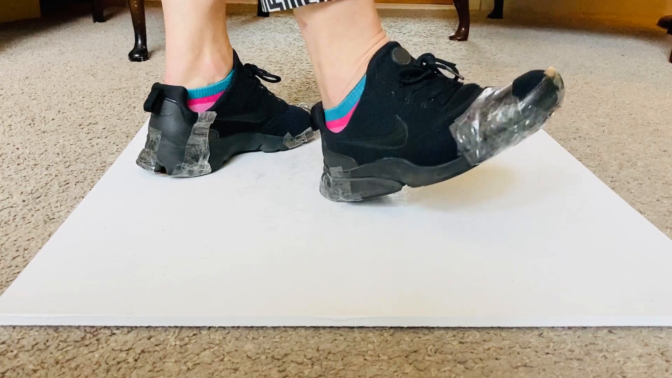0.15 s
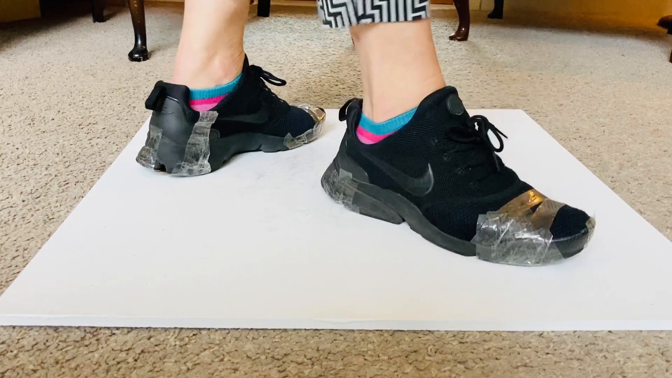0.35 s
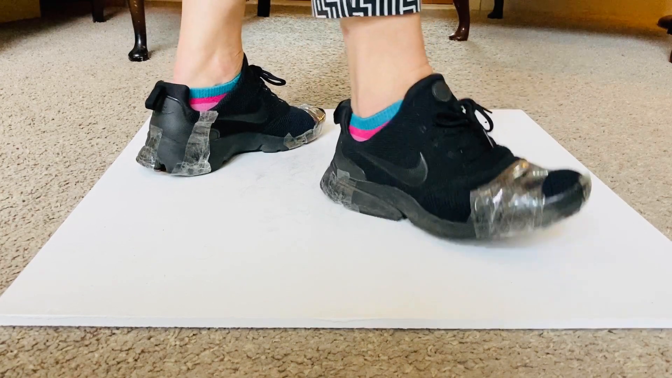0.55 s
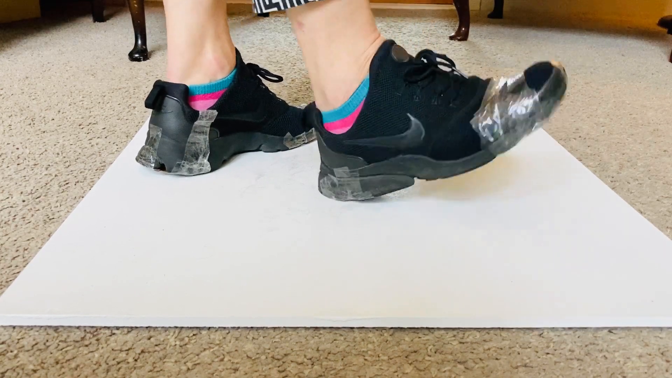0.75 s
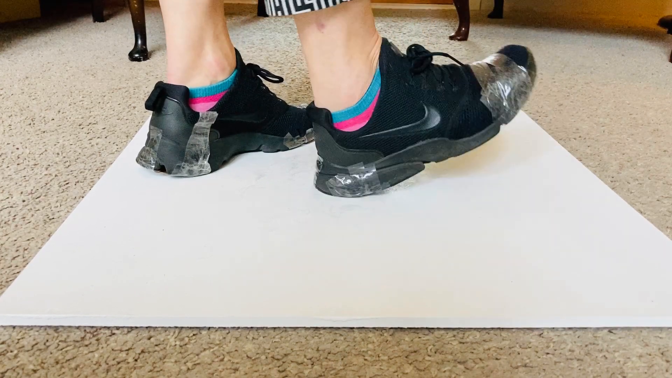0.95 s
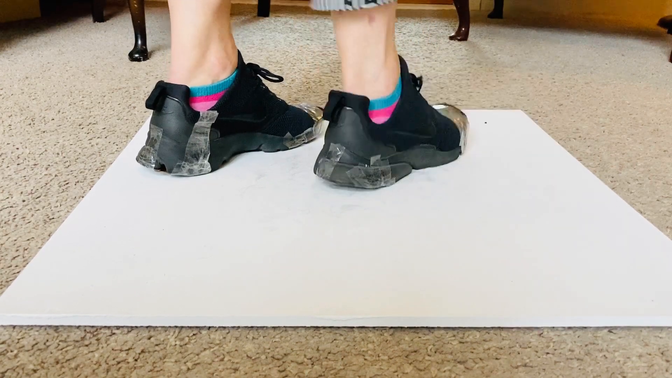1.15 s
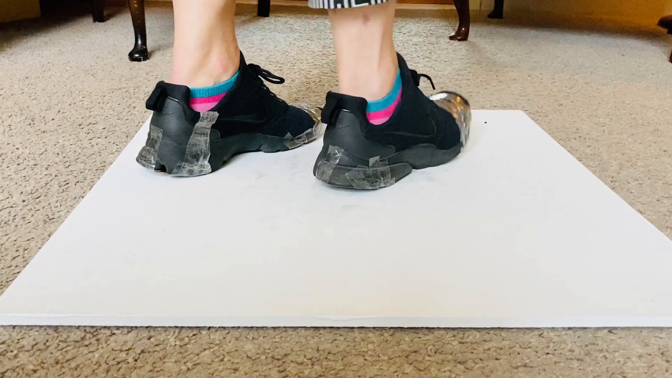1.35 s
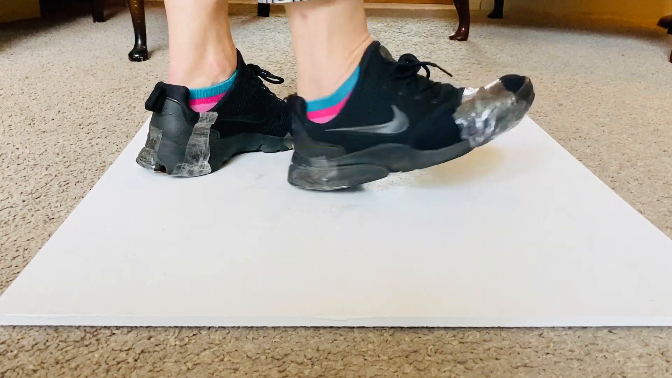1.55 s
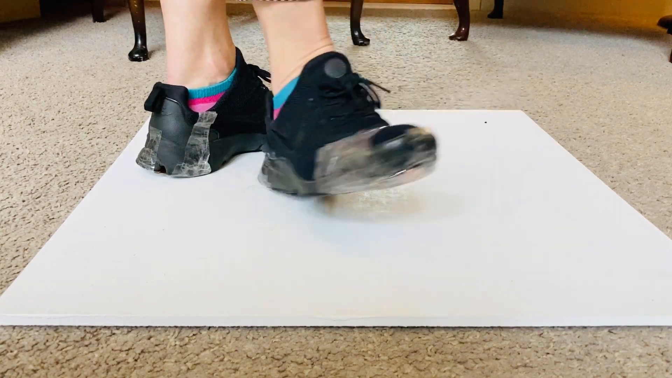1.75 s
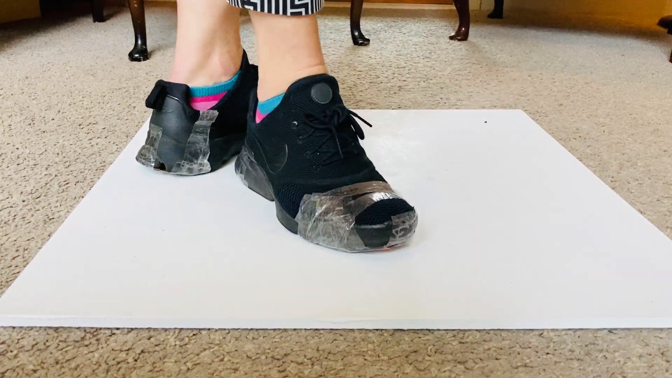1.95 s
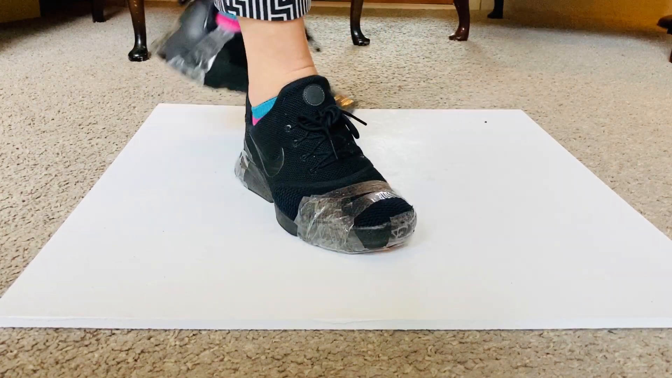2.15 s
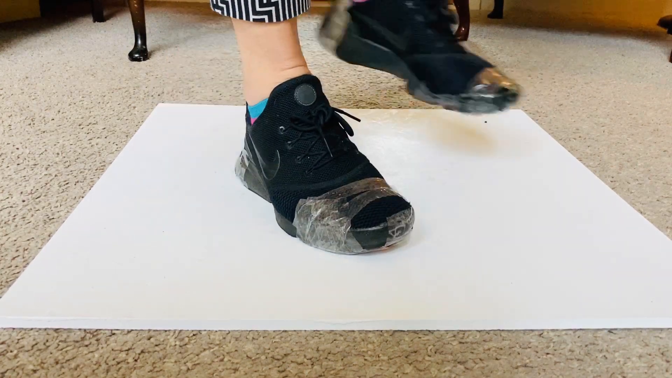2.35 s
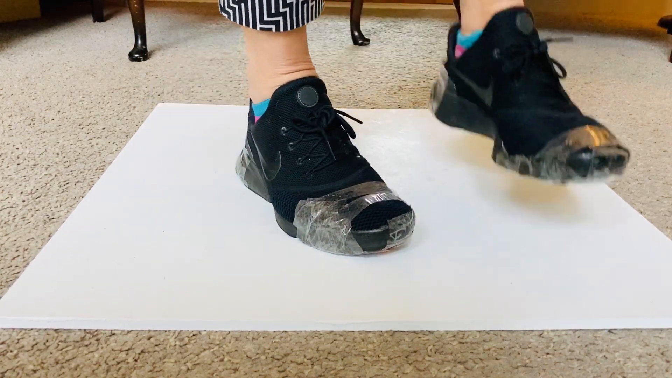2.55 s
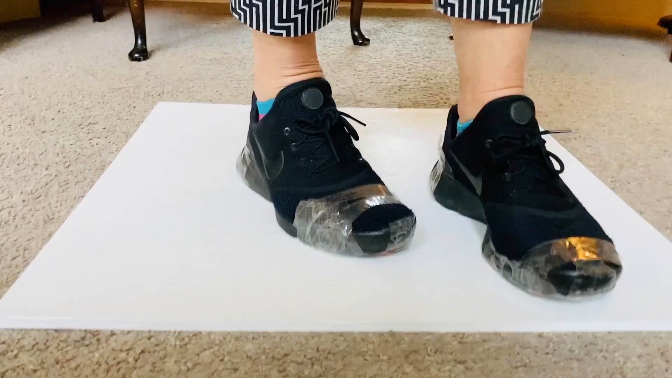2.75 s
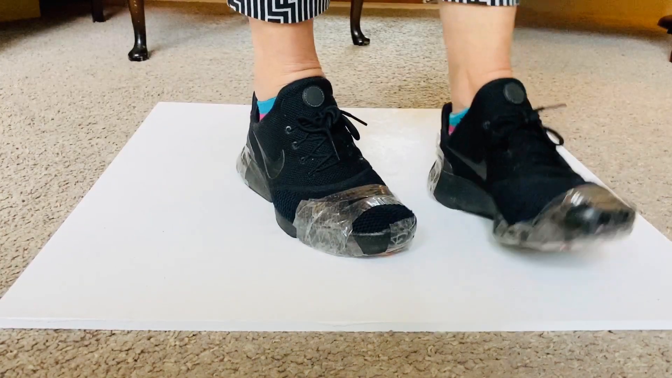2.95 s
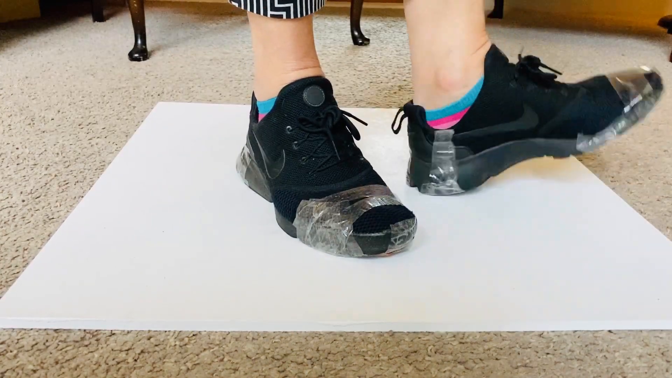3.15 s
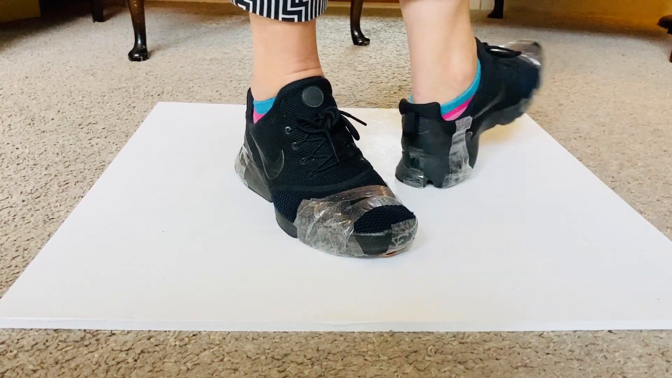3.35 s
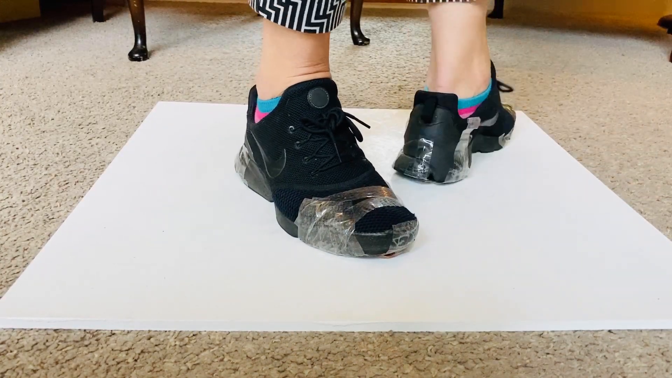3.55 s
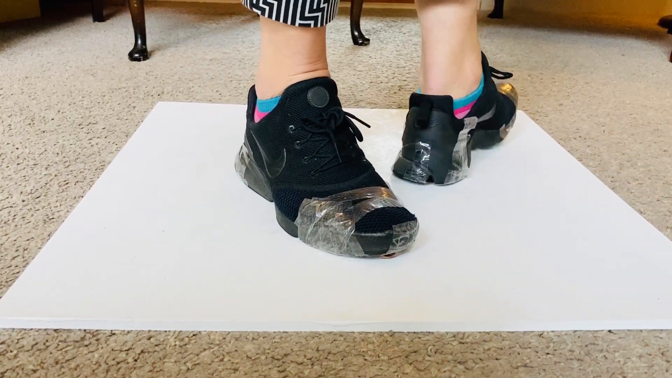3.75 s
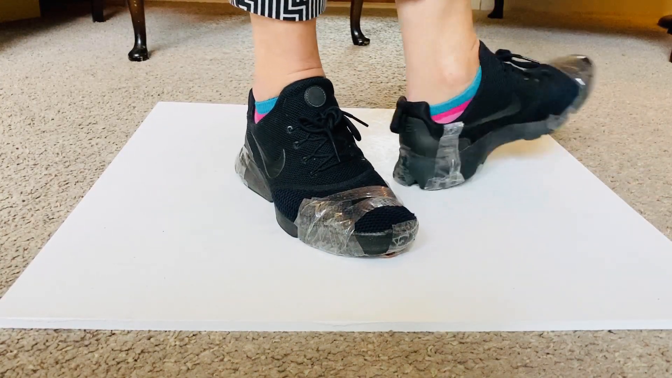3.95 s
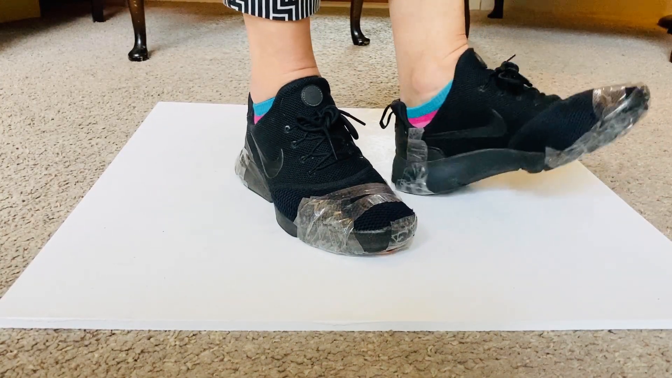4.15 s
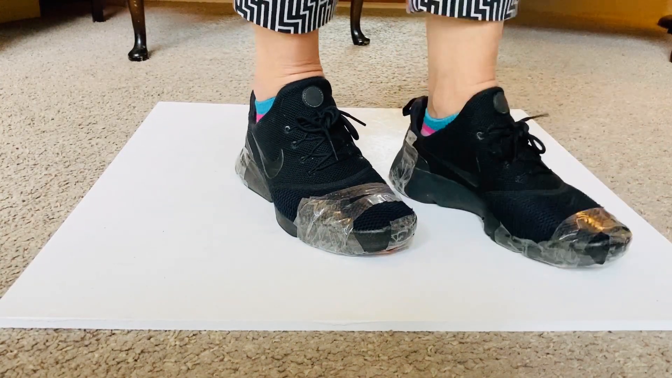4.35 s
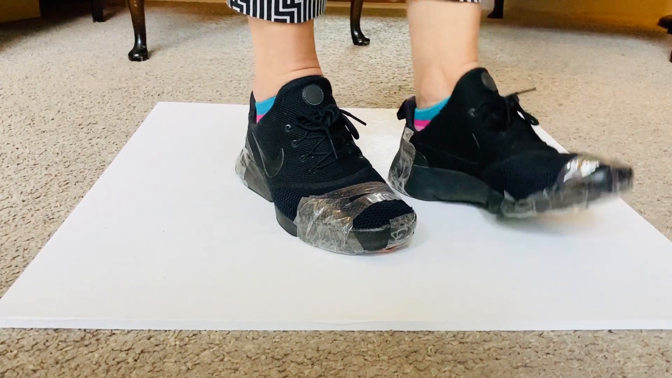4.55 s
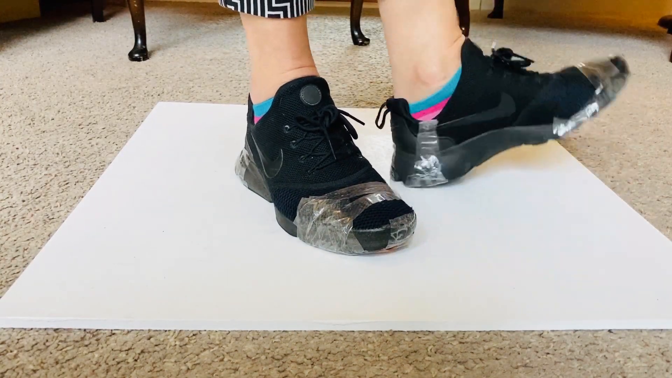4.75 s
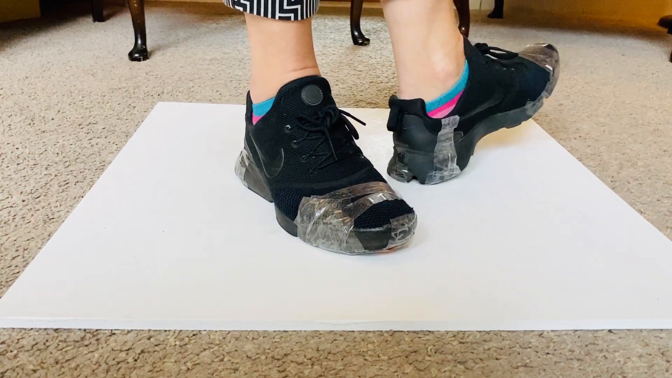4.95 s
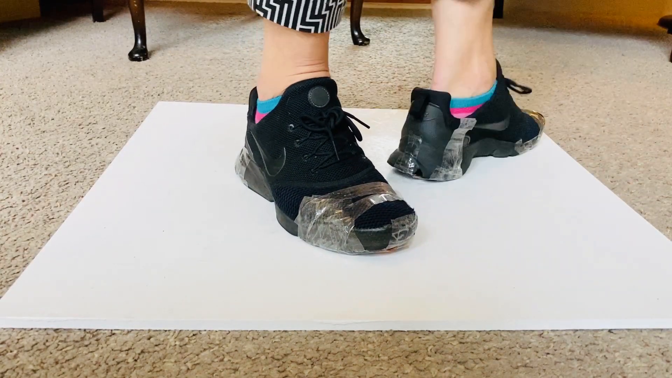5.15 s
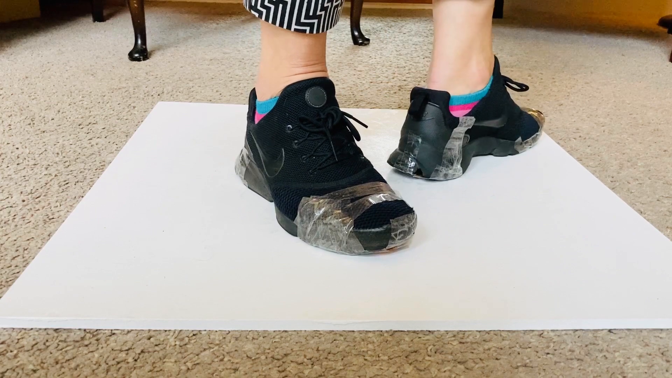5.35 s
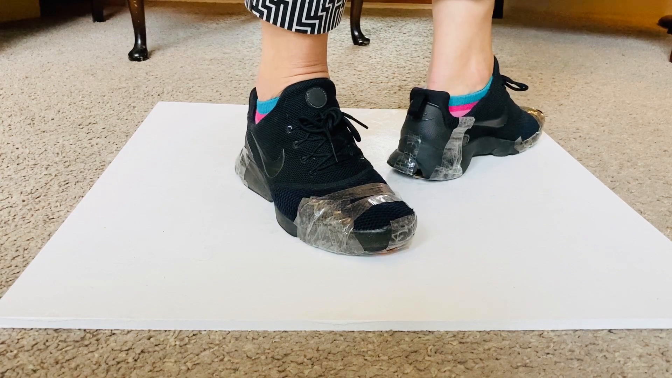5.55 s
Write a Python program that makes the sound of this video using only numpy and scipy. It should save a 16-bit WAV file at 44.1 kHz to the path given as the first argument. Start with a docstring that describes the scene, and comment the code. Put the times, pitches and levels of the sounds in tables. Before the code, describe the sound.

Taped rubber-soled shoes tap seven evenly spaced steps on a thin board over carpet, with crackling tape and soft cloth rustle between.

```python
"""Shoes with tape round toe and heel tap seven times on a thin board lying on carpet in a living room.
First the tape crackles and clothes rustle; about every 0.8 s, from 0.4 s to 5.2 s, a step comes down.
A gritty brush leads into a knock of the sole, then random collisions slap as the board is pressed flat,
and a thump sets slowly swelling low tones booming. Between steps come tape snaps, grazes and cloth rubs.
The room answers with fading noise over a faint hush, and all is heard close by in stereo."""
import sys
import numpy as np
from scipy import signal
from scipy.fft import rfft, irfft, next_fast_len
from scipy.io import wavfile

SR = 44100
rng = np.random.default_rng(int(sys.argv[2]) if len(sys.argv) > 2 else 0)


def dump(signal):
    """Clip the signal to [-1, 1] and save it as 16-bit WAV at the path in sys.argv[1]."""
    limited = np.clip(np.atleast_2d(signal).T, -1, 1)
    pcm = np.round(limited * 32767).astype(np.int16)
    wavfile.write(sys.argv[1], SR, pcm)


N = 246959
T = np.arange(N) / SR

# The sole meets the board: (time [s], level [dB], pitch [Hz], gritty edge level [dB],
# then the brush that leads in: swell time [s], level [dB], scrape pitch [Hz])
KNOCKS = [(0.4059, -8.5, 487, -17.5, 0.018, -33, 2280), (1.2393, -12.5, 455, -26.5, 0.016, -34, 7500),
          (1.953, -11.5, 433, -26.5, 0.023, -38.5, 6650), (2.766, -11, 331, -37.5, 0.005, -29.5, 2747),
          (3.6138, -24, 390, -30.5, 0.014, -34, 2980), (4.4106, -9, 462, -16, 0.021, -36.5, 2300),
          (5.1965, -25, 505, -29.5, 0.021, -39, 6870)]
# Board and taped sole clap together:
# (time [s], contact length [s], level [dB], brightest pitch [Hz], dull above [Hz])
SLAPS = [(0.4107, 0.0051, -11, 3120, 9000), (1.2448, 0.0036, -20, 3820, 5730),
         (1.2507, 0.0029, -11.5, 3870, 5180), (1.963, 0.0012, -22, 2420, 7870),
         (2.7647, 0.0037, -9.5, 3350, 9000), (2.778, 0.0027, -12.5, 7600, 13000),
         (3.621, 0.0067, -13.5, 4200, 5430), (4.418, 0.0054, -10.5, 4020, 8700),
         (5.2023, 0.0049, -10.5, 3380, 7180)]
# Weight comes down: (time [s], thump level [dB], ring time factor [-],
# then how hard it drives the low, middle and high tones of the boom [dB], [dB], [dB])
THUMPS = [(0.419, -19, 1.28, -33.5, -33, -37), (1.2537, -9.5, 0.91, -23.5, -12.5, -22),
          (1.968, -22, 0.75, -19.5, -16, -22.5), (2.566, -58, 0.39, -49, -44, -45.5),
          (2.786, -14.5, 1.3, -22, -30, -30.5), (3.627, -14.5, 0.9, -36.5, -30, -30),
          (4.4260, -10, 0.78, -30.5, -12.5, -19), (5.2112, -12, 0.69, -28.5, -26.5, -21)]


def from_db(db):
    """Turn decibels into gain."""
    return 10 ** (np.asarray(db) / 20)


def rms_one(x):
    """Scale a sound so that its rms is 1."""
    return x / np.sqrt(np.mean(x ** 2) + 1e-20)


def at_hz(points, hz, axis=1):
    """Read a column of a table at any pitch, on a log-frequency axis."""
    table = np.array(points)
    return np.interp(np.log(np.maximum(hz, 1)), np.log(table[:, 0]), table[:, axis])


def add(out, s, sound):
    """Mix a sound in, starting at a time in seconds."""
    start = max(round(s * SR), 0)
    out[..., start:start + sound.shape[-1]] += sound[..., :N - start]


def colour(x, points, size=4096):
    """Filter with the given spectrum, unit energy and no sound ahead of its cause (minimum phase)."""
    level_db = at_hz(points, np.fft.rfftfreq(size, 1 / SR))
    cepstrum = irfft(np.log(from_db(level_db)))
    # folding the cepstrum onto its first half gives minimum phase
    cepstrum[1:size // 2] *= 2
    cepstrum[size // 2 + 1:] = 0
    pulse = irfft(np.exp(rfft(cepstrum)))
    pulse = pulse / np.linalg.norm(pulse)
    return signal.fftconvolve(np.atleast_2d(x), pulse[None], axes=-1)[:, :N]


def band_pass(x, low_hz, high_hz):
    """Keep only the part of a sound between two pitches."""
    return signal.sosfilt(signal.butter(2, [low_hz, high_hz], "band", fs=SR, output="sos"), x)


def pair(two, likeness):
    """Turn two unrelated signals into left and right with the given correlation."""
    alike = np.clip(likeness, -1, 1)
    middle = np.sqrt((1 + alike) / 2) * two[0]
    side = np.sqrt((1 - alike) / 2) * two[1]
    return middle + side * np.array([[1], [-1]])


def grains(size, per_s, spread_db):
    """Make two trains of random clicks of uneven height, together of rms 1."""
    shape = (2, size)
    heights = from_db(spread_db * np.minimum(rng.exponential(1, shape), 4))
    heights = heights * rng.choice([-1, 1], shape)
    return rms_one(heights * (rng.random(shape) < per_s / SR))


def knocks(cycles=0.94, edge_s=0.0052):
    """The rubber sole bends the board for about two cycles; its tape gives the touch a gritty edge."""
    out, t = np.zeros((2, N)), T[:SR // 20]
    for s, level_db, hz, edge_db, *brush in KNOCKS:
        age = t * hz / cycles
        rise_and_fall = age ** 2 * np.exp(2 * (1 - age) - 0.55 * (age - 1) ** 2)
        bend = rise_and_fall * np.sin(2 * np.pi * hz * t)
        grit = band_pass(grains(len(t), 4000, 1.0), 700, 1900)
        edge = rms_one(pair(grit, 1.0)) * np.exp(-t / edge_s)
        add(out, s, from_db(level_db) * bend + from_db(edge_db) * edge)
    return out


def slaps(release_s=0.0013, focus_db=-2, focus_q=2.1):
    """Contact spreads over the sole in milliseconds: tiny collisions, each slap with its brightest band."""
    # spectrum of a slap: (pitch [Hz], relative level [dB])
    slap_colour = [(200, -4), (600, -7), (1000, -7.5), (1500, -14.5), (2200, -5), (3800, -3), (5200, -1),
                   (7000, -9), (10000, -14.5), (13000, -9.5), (16000, -27)]
    out, t = np.zeros((2, N)), T[:SR // 30]
    for s, length_s, level_db, bright_hz, dull_hz in SLAPS:
        contact = np.exp(-np.maximum(t - length_s, 0) / release_s - 0.14 * t / length_s)
        burst = pair(grains(len(t), 7000, 1.1), 0.67) * contact
        # each side gets the energy of the contact curve
        burst *= np.linalg.norm(contact) / np.linalg.norm(burst, axis=1, keepdims=True)
        focus = signal.lfilter(*signal.iirpeak(bright_hz, focus_q, fs=SR), burst)
        burst = burst + from_db(focus_db) * focus
        soft = signal.butter(2, min(dull_hz, .45 * SR), fs=SR, output="sos")
        add(out, s, from_db(level_db) * signal.sosfilt(soft, burst))
    return colour(out, slap_colour)


def thumps(width_s=0.002, leak_hz=55):
    """The sinking board moves the air in one slow swing, down and up; the deepest part leaks round its edge."""
    out = np.zeros(N)
    lead_s = 1 / 40  # the middle of the swing falls on the listed time
    for s, level_db, *drive in THUMPS:
        age = (T[:SR // 20] - lead_s) / width_s
        swing = age * np.exp((1 - age ** 2) / 2)
        add(out, s - lead_s, from_db(level_db) * swing)
    return signal.sosfilt(signal.butter(1, leak_hz, "high", fs=SR, output="sos"), out)


def boom(swell_s=0.016):
    """Low tones of board and room swell and die; the foot decides which ring most and how soon they fade."""
    # tones: (pitch [Hz], level [dB], time to fall 60 dB before the step's ring time factor [s])
    boom_modes = [(42.6, -12, 0.87), (56.7, 5, 0.41), (60.15, 0.5, 0.5), (76.15, 1.5, 0.38), (87, -22, .3),
                  (108.1, 7.5, .3), (122, -12.5, 0.5), (153, -7.5, 0.34), (151, -12, 0.072)]
    # pitches at which the three drive levels of each thump apply: low, middle, high [Hz]
    drive_hz = (56, 77, 110)
    out, t = np.zeros(N), T[:SR]
    for s, level_db, ring_factor, *drive_db in THUMPS:
        for hz, mode_db, t60 in boom_modes:
            loudness = from_db(np.interp(hz, drive_hz, drive_db) + mode_db)
            fade = loudness * np.exp(-np.log(1000) * t / (t60 * ring_factor))
            add(out, s, fade * (1 - np.exp(-t / swell_s)) * np.cos(2 * np.pi * hz * t))
    return out


def board(uneven_db=3.5, gain_db=6.5):
    """Every slap rings the board's modes, with strengths that vary at random by slap, alike on both sides."""
    # the board's own tones: (pitch [Hz], level before gain_db [dB], time to fall 60 dB [s])
    board_modes = [(236, -39.5, 0.56), (317, -35, 0.046), (402, -33, 0.042), (562, -32.5, 0.18),
                   (699, -38, 0.16), (960, -34.5, 0.12), (1199, -37.5, 0.2), (1338, -39, 0.18),
                   (1933, -36, 0.24), (2230, -32, 0.13), (2508, -29.5, 0.19), (3430, -30.5, 0.058),
                   (3400, -36.5, 0.071), (3650, -27.5, 0.067), (4530, -33.5, .1), (5130, -35, .1),
                   (5060, -37.5, .1), (6300, -44, 0.091)]
    out, t = np.zeros((2, N)), T[:SR // 3]
    hz, mode_db, t60 = np.transpose(board_modes)[:, :, None]
    fade = from_db(mode_db + gain_db) * np.exp(-np.log(1000) * t / t60)
    rings = fade * np.sin(2 * np.pi * hz * t)
    shape = (2, len(board_modes))
    for s, length_s, level_db, *colouring in SLAPS:
        strengths = from_db(uneven_db * rng.standard_normal(shape)) * rng.choice([-1, 1], shape)
        add(out, s, from_db(level_db) * pair(strengths, 1.0) @ rings)
    return out


def snaps(crack_db=14, body_db=20, tear_s=0.00049, settle_db=-13, count=3):
    """A crease in the tape flips: one sharp click, a brief tearing, then a few smaller creases settle."""
    # the loudest snaps: (time [s], level before crack_db or body_db [dB], duller body relative to it [dB])
    loud_snaps = [(0.0642, -25.5, -25), (0.316, -47.5, -3.5), (0.698, -34.5, -5), (0.7596, -32, -7.5),
                  (0.7736, -19.5, -14.5), (0.8362, -32.5, -7.5), (1.1466, -32, -25), (1.164, -25.5, -13.5),
                  (1.523, -29, -32), (1.5729, -26.5, -5.5), (1.6527, -29, -29), (1.9758, -26.5, -12),
                  (2.001, -26.5, -9), (2.0393, -28.5, -37), (2.3145, -27, -27.5), (2.4588, -40.5, -15),
                  (2.4743, -33, -5), (2.9574, -27, -12), (2.977, -33, -8), (3.044, -31.5, -33),
                  (3.143, -37.5, -6.5), (3.3129, -30, -19.5), (3.3355, -27.5, -34.5), (3.4493, -31, -27),
                  (3.486, -36.5, 0), (3.5404, -20.5, -34), (3.8569, -27.5, -31.5), (3.9017, -28.5, -33),
                  (3.953, -28, -26), (4.1695, -33.5, -27), (4.3485, -22.5, -13), (4.4484, -16.5, -5.5),
                  (4.5458, -28.5, -14), (4.6662, -30.5, -21), (4.7296, -23, -7.5), (5.046, -28.5, -35.5),
                  (5.1086, -34, -6.5), (5.4037, -26.5, -31), (5.45, -29.5, -28)]
    # spectrum of the crack: (pitch [Hz], relative level [dB])
    crack_colour = [(1000, -25), (3000, -22), (5500, -0.5), (7800, -4), (11000, 0), (13500, -10),
                    (16000, -12.5)]
    # spectrum of the body: (pitch [Hz], relative level [dB])
    body_colour = [(300, -40), (1000, -17.5), (2200, 1.5), (3500, -4.5), (5000, -2), (9000, -9)]
    cracks, bodies, t = np.zeros((2, N)), np.zeros((2, N)), T[:SR // 25]
    for s, peak_db, body_rel_db in loud_snaps + small_snaps():
        flip = 0.52 * pair(grains(len(t), 12000, 7.5), 0.86) * np.exp(-t / tear_s)
        flip[:, 0] += 1  # the sharp click
        flip /= np.linalg.norm(flip)
        later = rng.integers(SR // 600, len(t), count)
        flip[:, later] += from_db(settle_db) * rng.standard_normal(count) * np.exp(-t[later] / 0.016)
        add(cracks, s, from_db(peak_db + crack_db) * flip)
        add(bodies, s, from_db(peak_db + body_db + body_rel_db) * flip)
    return colour(cracks, crack_colour) + colour(bodies, body_colour)


def small_snaps(count=70, over_crinkle_db=24, spread_db=4, body_rel_db=-12.5):
    """Lesser snaps come at random times, their level following how much the shoe bends just then."""
    places, sizes = rng.integers(0, N, count), rng.standard_normal(count)
    crinkle_db = 20 * np.log10(bending()[0, places])
    peaks_db = crinkle_db + over_crinkle_db + spread_db * sizes
    return [(s, peak_db, body_rel_db) for s, peak_db in zip(T[places], peaks_db)]


def brushes(stop_s=0.0046, per_s=1500, scrape_db=3, scrape_q=3):
    """Tape catches and slips on the board in a gritty swell that stops short, scraping in one band."""
    # the sole grazes the board between steps:
    # (time at the loudest [s], swell time [s], level [dB], scrape pitch [Hz])
    grazes = [(0.376, 0.0068, -41, 4020), (2.183, 0.0089, -38, 11170), (2.23, 0.017, -45.5, 4060),
              (3.5792, 0.0014, -30, 1990), (4.377, 0.016, -41.5, 3120), (4.698, 0.0065, -49, 3000),
              (5.116, 0.01, -44.5, 2800)]
    # spectrum of a brush: (pitch [Hz], relative level [dB])
    brush_colour = [(300, -15.5), (1000, -13.5), (2300, -4.5), (4000, -4.5), (7000, -8.5), (11000, -7.5),
                    (16000, -16.5)]
    out, lead_s = np.zeros((2, N)), 1 / 5
    t = T[:SR // 4] - lead_s
    # before a step the brush is loudest 1.5 ms ahead of the knock
    landings = [(s - 0.0015, *brush) for s, level_db, hz, edge_db, *brush in KNOCKS]
    for s, swell_s, level_db, scrape_hz in landings + grazes:
        rise_and_stop = np.exp(np.minimum(t / swell_s, -t / stop_s))
        slips = pair(grains(len(t), per_s, 5.7), 0.7) * rise_and_stop
        scrape = signal.lfilter(*signal.iirpeak(scrape_hz, scrape_q, fs=SR), slips)
        add(out, s - lead_s, from_db(level_db) * (slips + from_db(scrape_db) * scrape))
    return colour(out, brush_colour)


def rustle(crinkle_gain_db=3, scuff_gain_db=0, cloth_gain_db=-1):
    """The flexing shoe crinkles its tape in clumps and lone crackles, the sole scuffs, cloth rubs softly."""
    # spectrum of the tape crinkle: (pitch [Hz], relative level [dB])
    crinkle_colour = [(2000, -31.5), (5000, 0), (7500, -1), (11000, 0.5), (13500, -10.5), (16000, -11.5)]
    # spectrum of the sole scuff: (pitch [Hz], relative level [dB])
    scuff_colour = [(300, -13), (800, -9), (1800, -1.5), (3500, -1.5), (5000, 1.5), (8000, -17),
                    (16000, -30.5)]
    # spectrum of the cloth rub: (pitch [Hz], relative level [dB])
    cloth_colour = [(30, -14.5), (70, -1.5), (140, -1), (260, -1.5), (500, -10), (900, -12), (3000, -27)]
    crinkling, scuffing = bending()
    clumps = flutter(70, 3.5)
    crackles = .85 * pair(grains(N, 55, 3.0), .95)
    fine = pair(grains(N, 2200, 4.0), .92)
    coarse = pair(grains(N, 1100, 3.8), .45)
    crinkle = (fine * clumps + crackles) * crinkling * from_db(crinkle_gain_db)
    scuff = shifting(coarse * clumps + crackles) * scuffing * from_db(scuff_gain_db)
    cloth = pair(rng.standard_normal((2, N)), .9) * leg_motion() * from_db(cloth_gain_db)
    return colour(crinkle, crinkle_colour) + colour(scuff, scuff_colour) + colour(cloth, cloth_colour)


def flutter(per_s, depth_db):
    """Make a gain that wanders at random."""
    points = rng.standard_normal(int(N / SR * per_s) + 2)
    return from_db(depth_db * np.interp(T * per_s, np.arange(len(points)), points))


def shifting(x, depth_db=4.5, count=7):
    """Each band of a rubbing sound comes and goes on its own as the contact moves."""
    edges = np.geomspace(800, 8000, count)
    bands = [band_pass(x, low_hz, high_hz) for low_hz, high_hz in zip(edges, edges[1:])]
    return x + sum(band * (flutter(18, depth_db) - 1) for band in bands)


def swell(start_s, hold_s, attack_db_per_s, release_db_per_s):
    """Make a gain that rises, holds at 1 and dies away."""
    rise_db = attack_db_per_s * np.maximum(start_s - T, 0)
    fall_db = release_db_per_s * np.maximum(T - start_s - hold_s, 0)
    return from_db(-rise_db - fall_db)


def bending(attack_db_per_s=402, release_db_per_s=106):
    """Gains of tape crinkle and sole scuff: both follow each bend of the shoe and each landing."""
    # the shoe bends as the foot lifts or turns, levels before the gains in rustle():
    # (start [s], hold [s], tape crinkle level [dB], sole scuff level [dB])
    flexes = [(0.0, 0.017, -57.5, -56), (0.677, 0.15, -62.5, -60), (1, 0.3, -62.5, -65),
              (1.509, .13, -57, -57.5), (1.743, 0.11, -65, -59.5), (2.153, 0.11, -62.5, -62.5),
              (2.406, .13, -72, -75.5), (2.966, 0.37, -65, -60), (3.484, 0.055, -64.5, -59),
              (3.946, 0.09, -58, -61), (4.149, 0.23, -67.5, -65), (4.687, 0.15, -59.5, -58.5),
              (5.07, 0.1, -61.5, -60), (5.408, 0.17, -73.5, -72)]
    # every landing squeezes the tape: (hold [s], crinkle level [dB], scuff level [dB])
    squeeze = (0.053, -61, -58)
    landings = [(knock[0], *squeeze) for knock in KNOCKS]
    gains = np.zeros((2, N))
    for s, hold_s, *levels_db in flexes + landings:
        shape = swell(s, hold_s, attack_db_per_s, release_db_per_s)
        gains = np.maximum(gains, from_db(levels_db)[:, None] * shape)
    return gains


def leg_motion(drop_lead_s=.025, drop_hold_s=0.23, drop_db=-59, rest_db=-91.5):
    """Gain of the cloth rub: a rounded swell for each leg swing, and a rise and fall round every step."""
    # leg swings, levels before the cloth gain in rustle():
    # (time at the fastest [s], half length [s], level [dB])
    leg_swings = [(0.017, 0.053, -54), (1.05, 0.16, -68.5), (1.563, 0.035, -57), (1.7, 0.062, -54),
                  (1.94, 0.11, -44), (2.184, 0.035, -55), (2.554, .03, -74), (3.06, 0.12, -59.5),
                  (3.21, 0.049, -53.5), (4.15, .11, -64.5), (4.85, .06, -61.5), (4.933, 0.05, -60)]
    swings = [from_db(level_db) / (1 + ((T - s) / half_s) ** 2 / 2) ** 2
              for s, half_s, level_db in leg_swings]
    # the leg drops into the step and settles: rises 220 dB per s, falls 192 dB per s
    drops = [from_db(drop_db) * swell(s - drop_lead_s, drop_hold_s, 220, 192) for s, *rest in KNOCKS]
    return from_db(rest_db) + np.max(swings + drops, axis=0)


def room(x, first_s=0.0013, build_s=0.0009, count=15):
    """Dense reflections, made of noise, build up quickly and die band by band."""
    # the room's answer: (pitch [Hz], level [dB], time to fall 60 dB [s], left-right likeness [-1 to 1])
    room_bands = [(146, -9, 0.59, 0.68), (274, -7.5, 0.2, 1), (585, -11, 0.34, .2), (1150, -1.5, .36, .1),
                  (2120, -7, 0.39, .1), (4860, -8, 0.34, 0.04), (7350, -6.5, 0.3, 0.95),
                  (11000, -12.5, 0.22, 1), (16000, -11.5, .22, 0.87)]
    t, answer = T[:SR * 2 // 3], 0
    edges = np.geomspace(130, 18000, count)
    late = np.maximum(t - first_s, 0)
    for low, high in zip(edges, edges[1:]):
        level_db, t60, likeness = [at_hz(room_bands, np.sqrt(low * high), axis=k + 1) for k in range(3)]
        noise = band_pass(rng.standard_normal((2, len(t))), low, high)
        tail = pair(noise, likeness) * (1 - np.exp(-late / build_s)) * np.exp(-np.log(1000) * t / t60)
        tail = tail / np.linalg.norm(tail, axis=1, keepdims=True)
        # a wider band carries more energy
        answer = answer + from_db(level_db) * np.sqrt(2 * (high - low) / SR) * tail
    return signal.fftconvolve(x, answer, axes=-1)[:, :N]


def hush(level_db=-70):
    """A faint steady background: mostly low noise, nearly alike on both sides."""
    # spectrum of the hush: (pitch [Hz], relative level [dB])
    hush_colour = [(20, -18.5), (55, -1), (120, -1), (300, -21.5), (1000, -27), (5000, -33), (16000, -32)]
    return from_db(level_db) * colour(pair(rng.standard_normal((2, N)), 0.91), hush_colour)


def scene(slap_room_db=-4, tape_room_db=-1, snap_room_db=-5, count=2):
    """Steps and tape noises in the room, over a faint hush."""
    blows = knocks() + thumps()
    rubbing = brushes() + rustle()
    ticks = snaps()
    # the wide board sends a different slap toward each wall
    slap_tail = from_db(slap_room_db) * sum(room(slaps()) for wall in range(count))
    tail = room(blows + from_db(tape_room_db) * rubbing + from_db(snap_room_db) * ticks)
    direct = blows + slaps() + board() + boom() + rubbing + ticks
    return direct + slap_tail + tail + hush()


def record(dry, low_cut_hz=27, top_cut_hz=16300):
    """Left and right differ in phase and level, as a phone's stereo processing leaves them.

    Rumble is cut, peaks are rounded and the top is cut."""
    # phase of left ahead of right, negative where it lags: (pitch [Hz], phase [radians])
    side_phase = [(0, 0), (1500, -.2), (3900, -.4), (5300, -3.1), (7000, -6.2), (9300, -9.4),
                  (11400, -12.5), (13700, -15.7), (16000, -18.8)]
    size = next_fast_len(N + SR // 10)
    hz = np.fft.rfftfreq(size, 1 / SR)
    # level of left over right: (pitch [Hz], level [dB])
    left_db = at_hz([(100, -1.2), (500, -1.1), (1100, 1.0), (2200, 2.3), (5000, 0.2), (9000, -0.4)], hz)
    # each side takes half of the difference
    phase = np.interp(hz, *np.transpose(side_phase))
    left = from_db(left_db / 2) * np.exp(1j * phase / 2)
    heard = irfft(rfft(dry, size) * np.array([left, 1 / left]), size)[:, :N]
    heard = signal.sosfilt(signal.butter(4, low_cut_hz, "high", fs=SR, output="sos"), heard)
    rounded = np.tanh(heard)
    return signal.sosfilt(signal.ellip(10, .2, 80, top_cut_hz, fs=SR, output="sos"), rounded)


dry = scene()
out = record(dry)
dump(out)
```